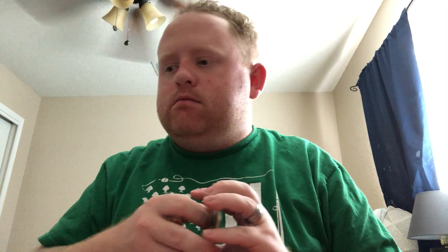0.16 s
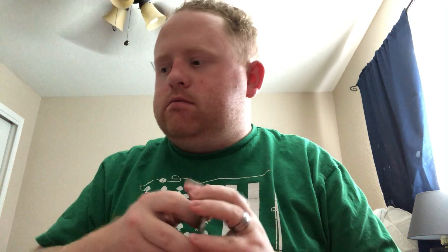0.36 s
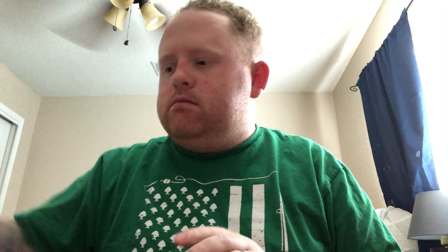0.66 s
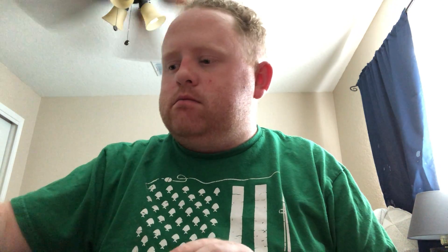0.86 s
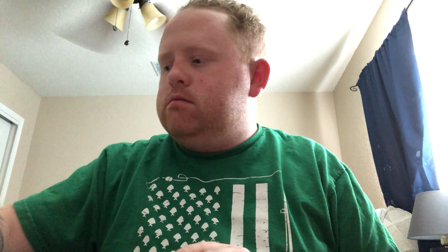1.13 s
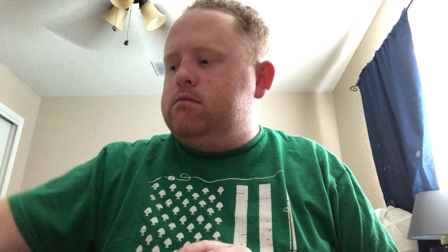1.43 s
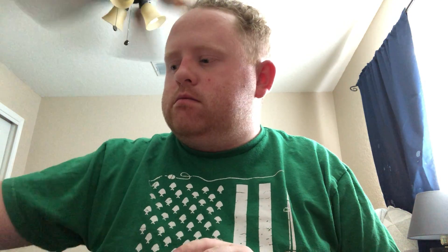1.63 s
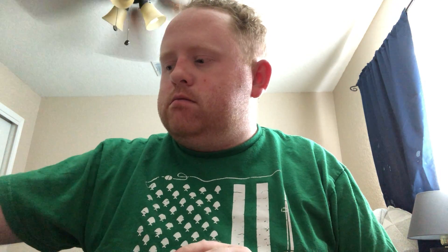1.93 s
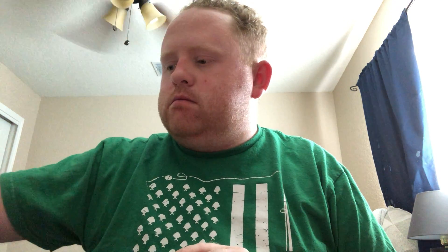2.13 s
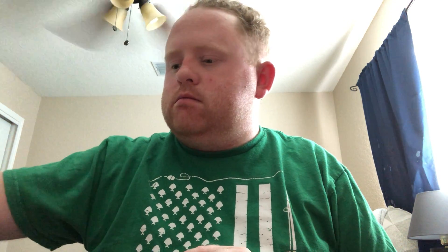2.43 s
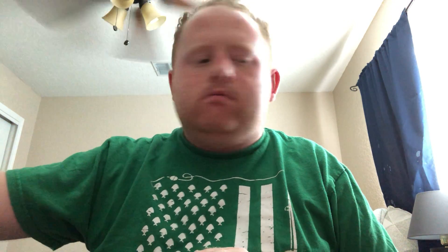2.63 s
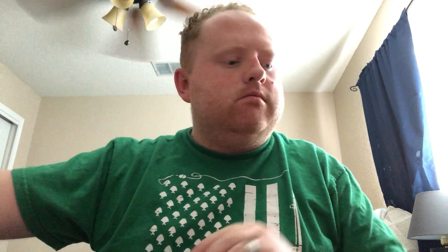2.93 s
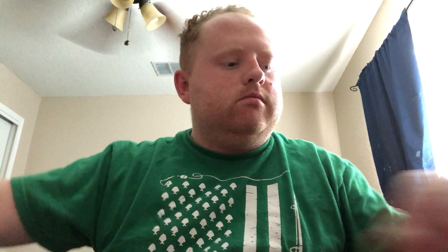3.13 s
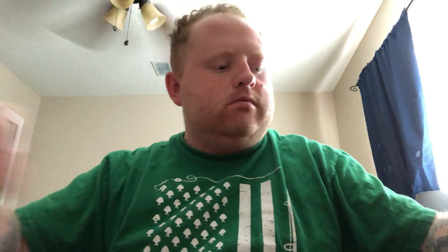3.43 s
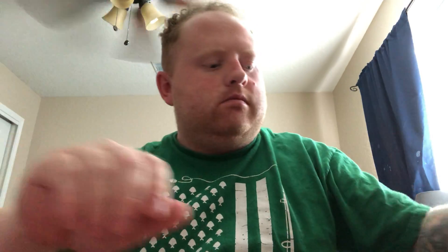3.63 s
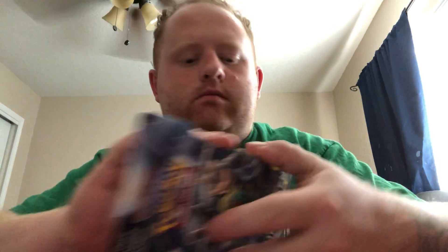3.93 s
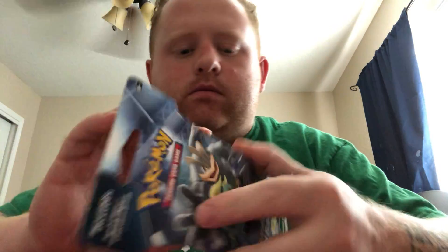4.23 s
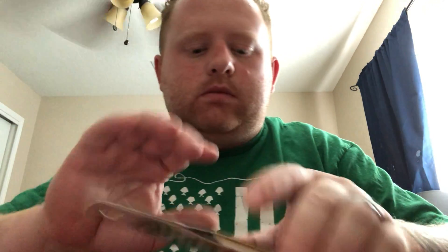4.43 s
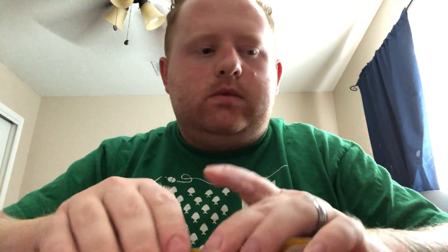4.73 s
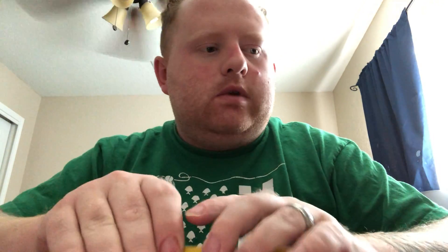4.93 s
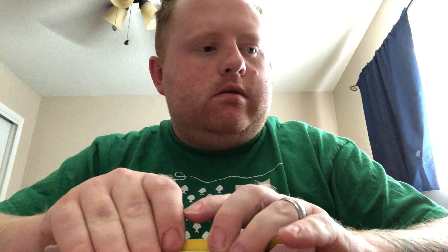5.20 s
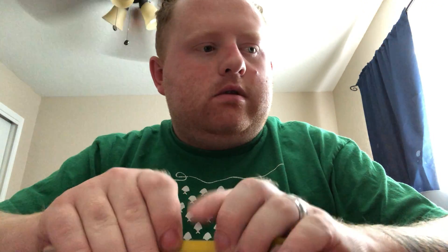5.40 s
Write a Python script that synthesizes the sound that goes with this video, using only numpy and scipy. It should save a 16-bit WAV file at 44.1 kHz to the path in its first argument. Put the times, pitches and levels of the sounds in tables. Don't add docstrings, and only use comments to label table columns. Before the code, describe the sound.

A stiff plastic case slaps onto a table, packaging rustles softly, then a blister is peeled in a quickening run of sharp plastic snaps.

```python
import sys
import numpy as np
from scipy import signal
from scipy.fft import rfft, irfft
from scipy.io import wavfile
from scipy.ndimage import uniform_filter1d

SR = 44100
rng = np.random.default_rng(int(sys.argv[2]) if len(sys.argv) > 2 else 0)


def log_audio(samples):
    frames = np.atleast_2d(samples).T
    limited = np.clip(frames, -1, 1)
    pcm = np.round(limited * 32767).astype(np.int16)
    wavfile.write(sys.argv[1], SR, pcm)


def convert_level_to_amplitude(level_db):
    exponent = np.asarray(level_db, float) / 20
    return 10 ** exponent


N = 245186
T = np.arange(N) / SR

# time in seconds, peak in dB, ring in Hz, body in dB.
PEEL_SNAPS = [(4.8316, -37, 5000, -26), (4.9252, -32.5, 2200, -12), (4.9386, -34, 4400, -23),
              (4.9564, -46, 1840, -4), (4.9845, -31, 3300, -10), (4.9952, -40, 3030, -9),
              (5.0121, -38, 3650, -8), (5.033, -33.5, 3300, -28), (5.045, -34, 3540, -29),
              (5.058, -31.5, 4230, -27), (5.0814, -31.5, 3520, -30), (5.1159, -22.5, 2430, -16.5),
              (5.1365, -26.5, 3070, -14.5), (5.1605, -29, 3820, -26), (5.174, -31, 3160, -10.5),
              (5.1952, -34, 3200, -16), (5.239, -30.5, 3630, -26), (5.248, -32, 3630, -30),
              (5.2845, -20, 2770, -19.5), (5.2974, -35, 2850, -21), (5.3188, -19.5, 3820, -13.5),
              (5.3333, -33.5, 4170, -17), (5.353, -34, 3550, -18), (5.3689, -32, 3630, -13),
              (5.3789, -31.5, 2600, -26), (5.3917, -32.5, 2530, -18), (5.408, -38, 2400, -8),
              (5.4134, -40, 1850, -9), (5.429, -42, 2340, -19), (5.44, -33.5, 3500, -9)]
# time in seconds, peak in dB, ring in Hz.
TEAR_SNAPS = [(5.453, -30.5, 3780), (5.4634, -30.5, 2900), (5.4753, -31.5, 3770), (5.4852, -40, 3560),
              (5.4949, -33, 3970), (5.4996, -35, 4250), (5.508, -34, 6200), (5.5157, -32, 5900),
              (5.5253, -32, 6440), (5.533, -33, 5930), (5.54, -32, 4600), (5.548, -32.5, 6040),
              (5.5554, -37, 5900)]
# pitch in Hz, level in dB, T60 in seconds.
FILM_MODES = [(1715, -3.5, 0.0075), (2400, 1, 0.0032), (3560, 0, 0.002), (5000, 0, 0.0021),
              (6100, -0.5, 0.0026), (7220, 1, 0.0023)]
# time in seconds, peak in dB, ring in Hz, body in dB.
CARD_TICKS = [(0.8947, -48.5, 2220, -2), (1.011, -54, 3440, 4), (1.0195, -49.5, 5000, -11),
              (2.194, -46.5, 3380, 6), (2.2089, -36.5, 2110, -4), (2.5132, -58.5, 4000, 3),
              (3.0133, -62, 2060, 3), (3.466, -47.5, 2140, -8), (3.5097, -38, 2280, -7),
              (4.4106, -25, 2900, -7.5), (4.633, -37.5, 2400, -9), (4.7292, -35, 3870, 0.5)]
# time in seconds, peak in dB, ring in Hz, edge in dB.
HAND_SCUFFS = [(0.0267, -44.5, 4660, -16), (0.4519, -50, 1940, -14), (3.526, -34.5, 1810, -9.5),
               (3.6441, -58, 5000, 0), (3.9578, -40, 2130, -8.5), (3.969, -40, 2660, -26),
               (3.9738, -37, 3050, -30), (3.9874, -47, 3610, -5), (4.2474, -45, 1980, -3.5),
               (4.355, -47, 2960, -7), (4.3647, -41.5, 3240, -10)]
# time in seconds, peak in dB, start pitch in Hz.
TABLE_KNOCKS = [(.002, -43.5, 144), (.276, -40, 270), (.291, -43, 83), (.348, -44, 268), (0.37, -41.5, 146),
                (.9, -43, 185), (1.021, -43.5, 237), (1.26, -36.5, 114), (1.29, -43, 229), (1.901, -47, 99),
                (1.947, -39.5, 476), (2.004, -40, 670), (2.051, -42.5, 144), (2.139, -39, 437),
                (2.22, -39, 332), (2.231, -38, 131), (2.558, -45, 200), (3.038, -47, 204),
                (3.612, -43.5, 520), (4.218, -43.5, 134), (4.409, -50, 141), (4.733, -39, 630),
                (4.882, -49, 199), (5.014, -38.5, 560), (5.12, -41.5, 600), (5.249, -43, 610),
                (5.312, -45, 91), (5.368, -38, 140), (5.405, -42, 126), (5.436, -42, 288)]
# time in seconds, peak in dB.
TEAR_SHUDDERS = [(5.456, -32), (5.468, -33.5), (5.476, -46), (5.488, -28.5), (5.495, -40.5), (5.501, -32.5),
                 (5.51, -30), (5.518, -35.5), (5.523, -37), (5.532, -32), (5.54, -37), (5.546, -28),
                 (5.551, -46), (5.557, -30)]
# time in seconds, blow in dB, crack in dB.
CASE_LANDINGS = [
    (1.2412, -12.5, -2.5),
    (1.865, -30.5, -22),
    (1.935, -31.5, -19),
    (2.212, -26, -9),
    (2.232, -28.5, -15),
    (2.29, -32.5, -23.5),
]
# pitch in Hz, level in dB, T60 in seconds.
CASE_MODES = [(332, -12.5, 0.028), (453, -15.5, 0.1), (675, -12.5, 0.026), (839, -23, 0.036),
              (1180, -25.5, 0.037), (1533, -11, 0.021), (2100, 8, 0.0029), (2900, -9, 0.0016),
              (3740, -2, 0.0067), (4600, -10.5, 0.0024), (5570, -4, 0.0028), (6640, -17, 0.0019),
              (7530, -8.5, 0.0047)]
# middle in seconds, length in seconds, level in dB, dull part in dB.
CARD_DRAGS = [(1.041, 0.052, -67, -3), (1.907, 0.09, -68.5, 16.5), (1.942, .026, -76.5, 17.5),
              (1.999, .022, -67, 11), (2.128, .03, -65, 7.5), (2.214, .022, -50, -4),
              (2.25, 0.08, -58.5, 0.5), (2.322, 0.1, -58.5, -2), (2.561, 0.015, -56.5, -1),
              (3.493, .043, -65, 7), (3.52, 0.016, -43.5, -1), (3.545, 0.05, -60.5, 10.5),
              (3.968, 0.017, -50, -4), (4.116, .03, -63, -30), (4.161, 0.14, -73.5, 10.5),
              (4.223, .074, -66.5, 2.5), (4.478, 0.072, -62.5, -3.5), (4.868, 0.061, -51, -14),
              (4.997, 0.084, -53.5, -3)]
# middle in seconds, length in seconds, level in dB, bright part in dB.
FILM_RUSTLES = [(.464, 0.037, -75, -1), (1.225, .014, -58, -4), (1.2364, 0.0064, -38.5, -8),
                (1.787, 0.17, -69, -4.5), (2.516, .026, -85.5, 11), (2.726, 0.027, -66, -4.5),
                (2.93, .034, -73, -7), (3.729, 0.058, -72, -2), (3.785, .17, -68, -5.5),
                (4.055, 0.062, -59, -9), (4.327, 0.051, -68, -5), (4.436, 0.045, -62, -8),
                (4.562, 0.066, -61, -6), (4.648, 0.021, -61, -6), (4.685, 0.046, -54.5, -5.5),
                (4.869, 0.065, -54, -2)]
# middle in seconds, length in seconds, level in dB, pitch in Hz.
FILM_SQUEAKS = [(1.896, 0.048, -58, 2900), (1.897, 0.077, -56.5, 1590), (1.935, 0.013, -61, 3460),
                (3.555, 0.027, -64, 2900), (4.11, 0.027, -58, 2900), (4.217, 0.053, -60.5, 3200),
                (4.047, 0.027, -56.5, 3200), (4.059, 0.054, -61, 10600), (4.69, 0.039, -61, 1520),
                (5.528, .03, -58, 3080)]
# time in seconds, film level in dB.
RUB_PRESSURE = [(0.0, -84), (0.59, -85), (1.08, -78), (1.75, -80), (1.9, -64), (2.14, -72), (3.34, -96),
                (3.53, -71), (3.81, -63.5), (3.92, -67.5), (4.17, -61), (4.49, -69), (4.69, -68.5),
                (4.89, -54), (5.17, -63), (5.36, -65), (5.47, -51), (5.56, -49)]
# frequency in Hz, density in dB per Hz.
DUCT_SPECTRUM = [(15, -60), (25, -39), (43, -1.5), (92, -3), (120, -8), (185, -6.5), (223, 1), (256, -10),
                 (285, -1), (363, -2.5), (818, -11.5), (1100, -14.5), (1900, -34), (5280, -37),
                 (16000, -58)]
# pitch in Hz, width in Hz, level in dB.
MOTOR_HUMS = [(121.8, 9, -59.5), (226.1, 6.1, -65.5), (289, 22, -64), (469, 85, -63), (1061, 23, -70.5)]


def level(x, db):
    return x * convert_level_to_amplitude(db) / np.sqrt(np.mean(x ** 2))


def band(x, hz, width_hz):
    hz = np.clip(hz, 20, 0.45 * SR)
    return signal.lfilter(*signal.iirpeak(hz, hz / width_hz, fs=SR), x)


def steep(x, hz, width_hz):
    return band(band(x, hz, width_hz), hz, width_hz)


def walk(rate_hz):
    hold = int(SR / rate_hz)
    steps = np.repeat(rng.standard_normal(N // 20), hold)[:N]
    return uniform_filter1d(uniform_filter1d(steps, hold), hold)


def ring(hz, t60_s, rise_s=0.000079, count=4000):
    t = T[:count]
    decay = np.exp(-np.log(1000) * t / t60_s)
    return np.sin(2 * np.pi * hz * t) * decay * (1 - np.exp(-t / rise_s)) ** 2


def add(out, s, x):
    i = max(int(s * SR), 0)
    out[i:i + len(x)] += x[:N - i]


def snap(hz, body_db, edge_db):
    count = 600
    t = T[:count]
    detune = rng.standard_normal(len(FILM_MODES) + 1)
    film = 0.82 * ring(hz, 0.0043, count=count)
    for k, (mode_hz, db, t60_s) in enumerate(FILM_MODES):
        reach_db = -7.0 * abs(np.log2(mode_hz / hz))
        mode = ring(mode_hz * (1 + 0.05 * detune[k]), t60_s, count=count)
        film = film + (-1) ** k * convert_level_to_amplitude(db + reach_db) * mode
    crinkle = steep(rng.standard_normal(count), 0.8 * hz, 1.08 * hz) * np.exp(-t / 0.0043)
    film = film + 0.25 * crinkle
    body = ring(1150 * (1 + 0.08 * detune[-1]), 0.007, 0.0003, count)
    body = body - 0.7 * ring(750, 0.008, 0.0004, count)
    spit = rng.standard_normal(count) * np.exp(-t / 0.00047)
    edge = steep(spit, 7460, 9200) + 0.47 * steep(spit, 12950, 7600)
    return 1.027 * film + 2.05 * convert_level_to_amplitude(body_db) * body + 2.25 * convert_level_to_amplitude(edge_db) * edge


def peel():
    out = np.zeros(N)
    loose_from_s, tight_edge_db, loose_edge_db = 5.36, -21, -40
    for s, db, hz, body_db in PEEL_SNAPS:
        edge_db = tight_edge_db if s < loose_from_s else loose_edge_db
        add(out, s, convert_level_to_amplitude(db) * snap(hz, body_db, edge_db))
    return out


def tear():
    out = np.zeros(N)
    body_db, edge_at_4khz_db, edge_db_per_octave = -11.5, -15.5, 20
    for s, db, hz in TEAR_SNAPS:
        edge_db = edge_at_4khz_db + edge_db_per_octave * np.log2(hz / 4000)
        add(out, s, convert_level_to_amplitude(db) * snap(hz, body_db, edge_db))
    return out


def scuff(db, hz, body_db, edge_db, fade_ms):
    count = 900
    slips = rng.standard_normal(count) * (rng.random(count) < 0.15)
    run = slips * np.exp(-T[:count] * 1000 / fade_ms)
    return 0.38 * convert_level_to_amplitude(db) * np.convolve(snap(hz, body_db, edge_db), run)


def ticks():
    out = np.zeros(N)
    near_from_s = 4
    for s, db, hz, body_db in CARD_TICKS:
        edge_db, fade_ms = (-12, 2.46) if s > near_from_s else (-24, 6.1)
        add(out, s, scuff(db, hz, body_db, edge_db, fade_ms))
    return out


def scuffs():
    out = np.zeros(N)
    for s, db, hz, edge_db in HAND_SCUFFS:
        add(out, s, scuff(db, hz, -16, edge_db, fade_ms=2.9))
    return out


def table_return(x):
    return x + 0.28 * np.roll(x, int(0.0012 * SR)) - 0.035 * np.roll(x, int(0.000807 * SR))


def knocks():
    out = np.zeros(N)
    shudders = [(s, db, 316 + 15 * (db + 39.5)) for s, db in TEAR_SHUDDERS]
    for s, db, hz in TABLE_KNOCKS + shudders:
        cycles = hz * T[:3000]
        phase = 2 * np.pi * np.log1p(0.33 * cycles) / 0.3075
        swell = (1 - np.exp(-cycles / 0.5)) * np.exp(-cycles / 2.1)
        add(out, s, -convert_level_to_amplitude(db) * 1.48 * np.sin(phase) * swell)
        board_note = ring(0.966 * hz, 25.0 / hz, 0.88 / hz)
        add(out, s, -convert_level_to_amplitude(db) * 0.5 * board_note)
    return out


def slap():
    out = np.zeros(N)
    for s, blow_db, crack_db in CASE_LANDINGS:
        for k, (hz, db, t60_s) in enumerate(CASE_MODES):
            gain = convert_level_to_amplitude(blow_db + db + crack_db * (hz > 1200))
            mode = ring(hz, t60_s, 0.37 / hz, count=6000)
            add(out, s + 0.35 / hz, (-1) ** k * gain * mode)
        crack = steep(rng.standard_normal(220), 8500, 9000) * np.hanning(220)
        add(out, s, convert_level_to_amplitude(blow_db + crack_db - 17) * crack)
    return out


def scrape(length_s, db, hz, dull_db, bright_db):
    room_for = 9000
    count = min(int(1.4 * length_s * SR), room_for)
    slip_size = np.minimum(rng.exponential(size=room_for), 4)
    x = rng.standard_normal(room_for) * convert_level_to_amplitude(2.5 * slip_size)
    catch = np.repeat(rng.standard_normal(90), 100)
    x = x * convert_level_to_amplitude(1.8 * uniform_filter1d(catch, size=60))
    voice = level(steep(x, hz, 0.35 * hz), -7)
    voice = voice + level(steep(x, 4350, 2600), -6.5)
    voice = voice + level(steep(x, 6230, 4300), bright_db / 2 - 4.5)
    voice = voice + level(steep(x, 1020, 1870), dull_db)
    voice = voice + level(steep(x, 9750, 14800), bright_db)
    return convert_level_to_amplitude(db) * signal.windows.tukey(count, 0.7) * voice[:count]


def drags():
    out = np.zeros(N)
    for s, length_s, db, dull_db in CARD_DRAGS:
        x = scrape(length_s, db, 3200, dull_db, bright_db=-15)
        add(out, s - len(x) / SR / 2, x)
    return out


def rustles():
    out = np.zeros(N)
    for s, length_s, db, bright_db in FILM_RUSTLES:
        x = scrape(length_s, db, 3600, -2, bright_db)
        add(out, s - len(x) / SR / 2, x)
    return out


def squeaks():
    out = np.zeros(N)
    for s, length_s, db, hz in FILM_SQUEAKS:
        count = min(int(1.5 * length_s * SR), 6000)
        width_share = 0.45 if 4.0 < s < 4.4 else 0.12
        tone = steep(rng.standard_normal(6000), hz, width_share * hz)
        add(out, s - count / SR / 2, level(tone, db)[:count] * np.hanning(count))
    return out


def grit(rate_hz, spread_db, smooth):
    hiss = rng.standard_normal(N)
    slipping = rng.random(N) < rate_hz / SR
    size = np.minimum(rng.exponential(size=N), 4.5)
    slips = slipping * np.sign(hiss) * convert_level_to_amplitude(spread_db * size)
    return level(slips, 0) + smooth * hiss


def rubbing():
    film_db = np.interp(T, *np.transpose(RUB_PRESSURE))
    card_db = -63.5 + 0.29 * (film_db + 70)
    x = grit(3000, 4.6, 0.53) * convert_level_to_amplitude(1.6 * walk(26.27))
    film = convert_level_to_amplitude(film_db) * level(band(x, 2720, 2750), -3)
    card = convert_level_to_amplitude(card_db) * level(steep(x, 1200, 1280), -5.0)
    edges = convert_level_to_amplitude(-74) * level(steep(x, 16500, 16500), -28.0)
    return film + card + edges


def air():
    hz, db = np.transpose(DUCT_SPECTRUM)
    f_hz = np.arange(1, N // 2 + 2) * SR / N
    shape = convert_level_to_amplitude(np.interp(np.log(f_hz), np.log(hz), db))
    duct = irfft(rfft(rng.standard_normal(N)) * shape, N)
    out = level(duct, -54.5) * convert_level_to_amplitude(0.91 * walk(6.2))
    for hum_hz, width_hz, hum_db in MOTOR_HUMS:
        out = out + level(band(rng.standard_normal(N), hum_hz, width_hz), hum_db)
    return out


def room(x):
    t60_s, treble_t60_s, room_db = 0.35, 0.16, -8.5
    t = T[:20000]
    low, high = rng.standard_normal((2, len(t)))
    tail = steep(low, 590, 5000) * np.exp(-np.log(1000) * t / t60_s)
    tail = tail + 1.14 * high * np.exp(-np.log(1000) * t / treble_t60_s)
    tail = tail * (1 - np.exp(-t / 0.00033))
    tail = tail / np.sqrt(np.sum(tail ** 2))
    return convert_level_to_amplitude(room_db) * signal.fftconvolve(x, tail)[:N]


def scene():
    near = table_return(peel() + tear() + ticks() + scuffs())
    far = slap() + drags() + rustles() + squeaks()
    mix = near + far + room(0.38 * near + far) + knocks() + rubbing() + air()
    return mix[None]


def band_limit(x):
    return signal.sosfilt(signal.butter(12, 16640, fs=SR, output="sos"), x)


def record(dry):
    low_cut = signal.sosfilt(signal.butter(2, 35, "high", fs=SR, output="sos"), dry)
    top_cut = signal.sosfilt(signal.cheby1(10, 0.5, 15700, fs=SR, output="sos"), low_cut)
    return band_limit(top_cut + 0.05 * low_cut)


dry = scene()
out = record(dry)
log_audio(out)
```